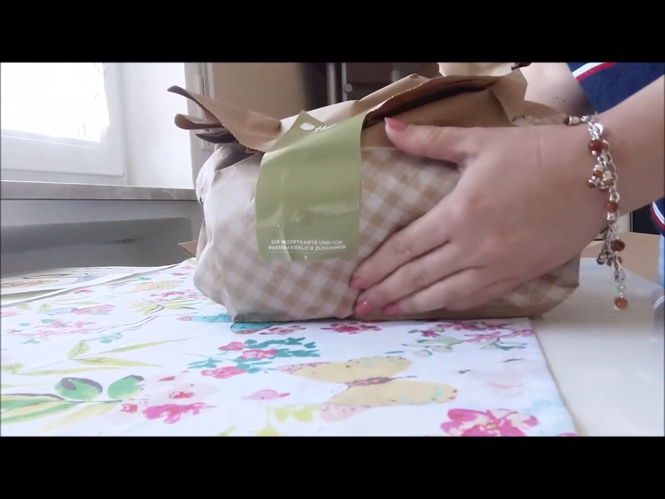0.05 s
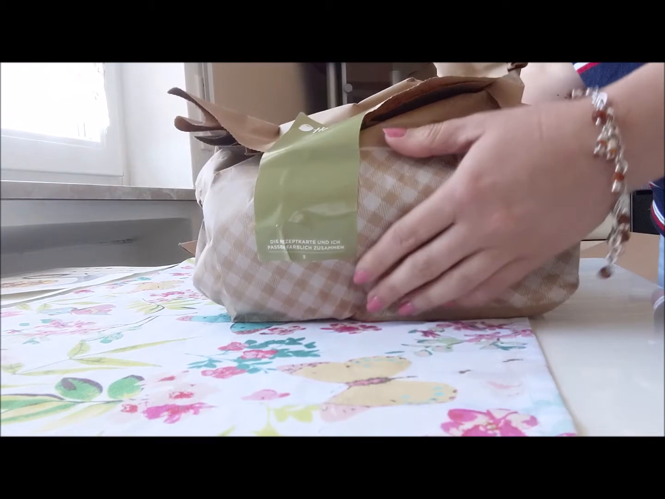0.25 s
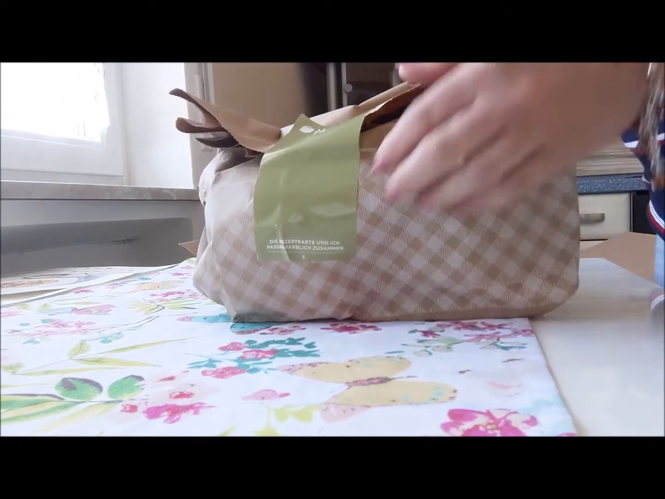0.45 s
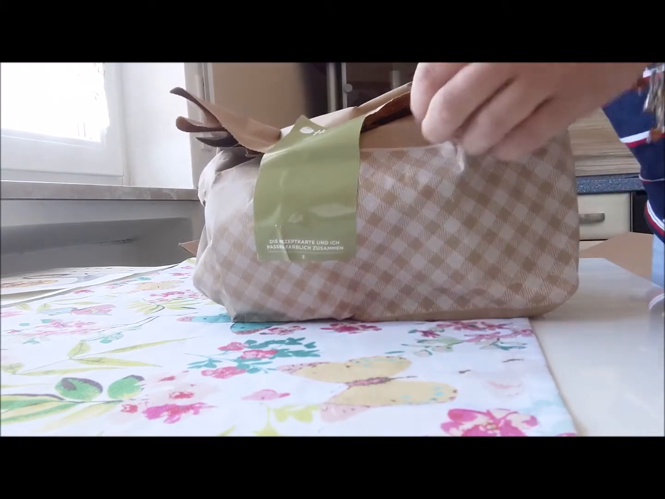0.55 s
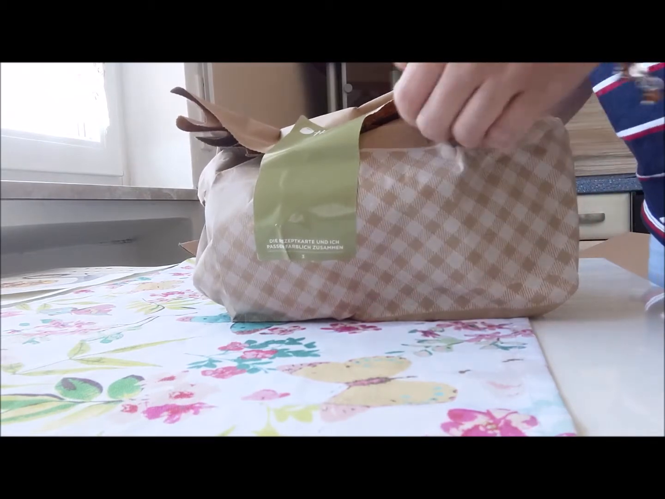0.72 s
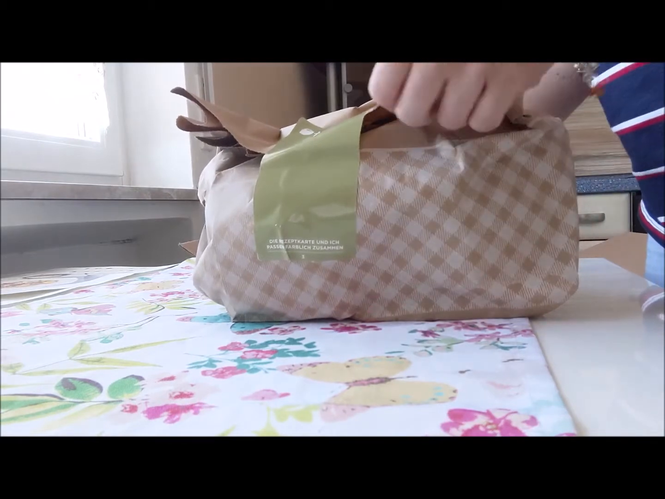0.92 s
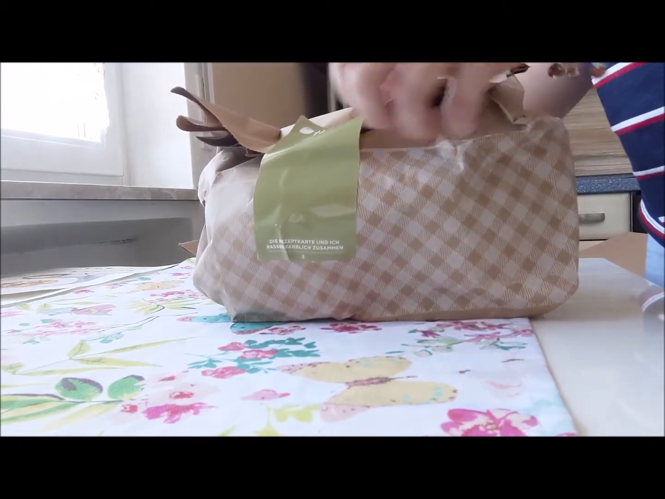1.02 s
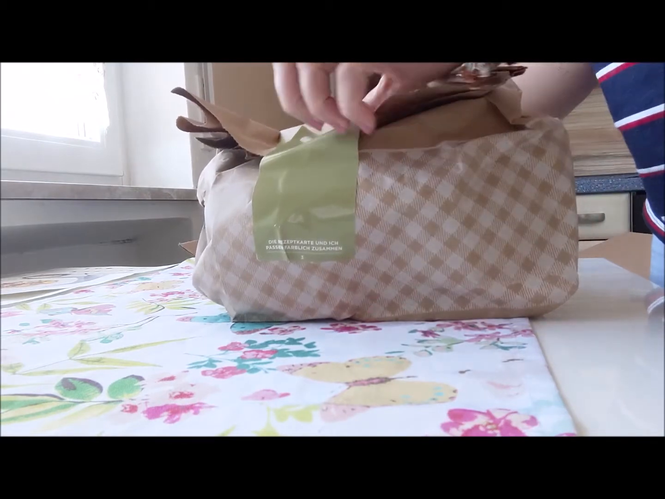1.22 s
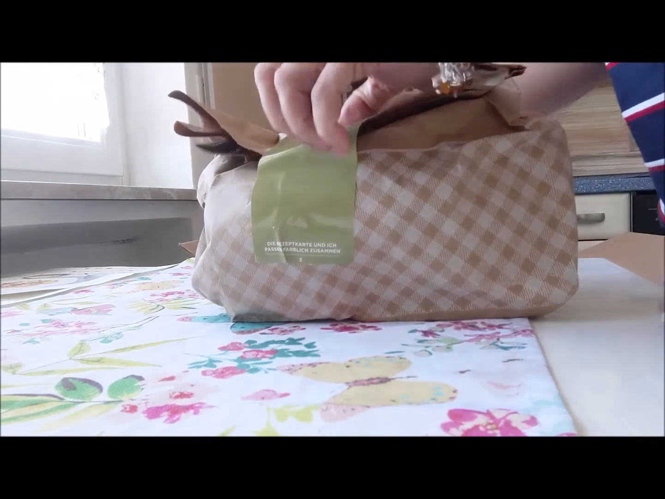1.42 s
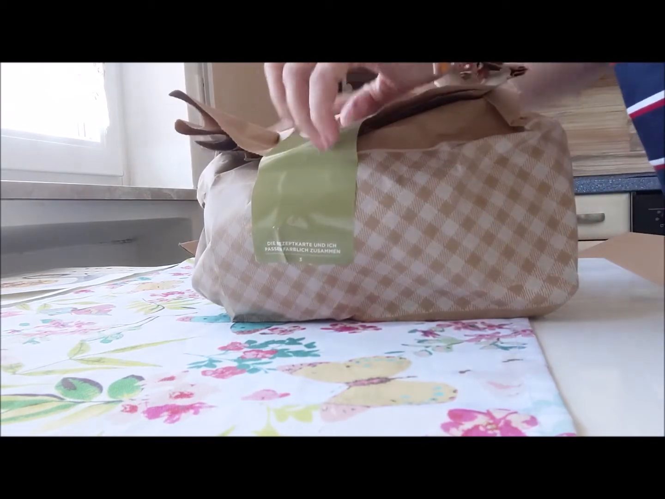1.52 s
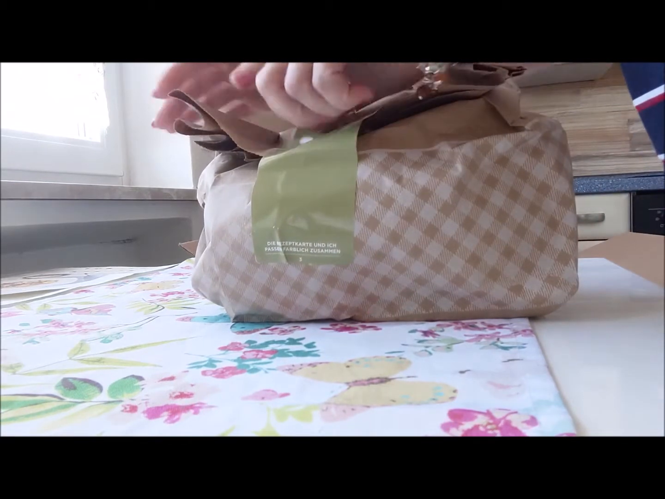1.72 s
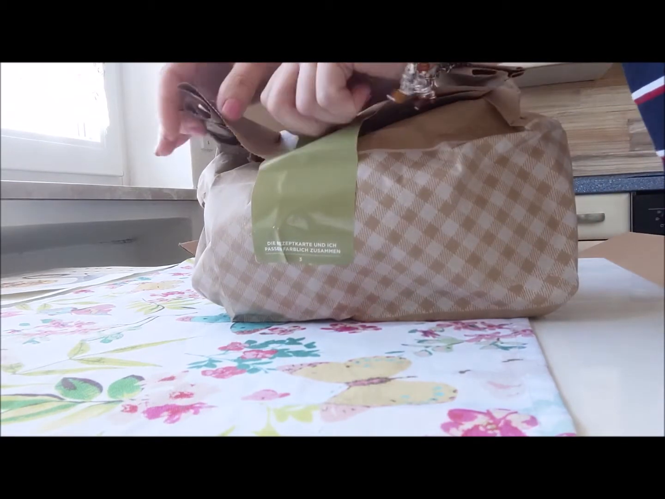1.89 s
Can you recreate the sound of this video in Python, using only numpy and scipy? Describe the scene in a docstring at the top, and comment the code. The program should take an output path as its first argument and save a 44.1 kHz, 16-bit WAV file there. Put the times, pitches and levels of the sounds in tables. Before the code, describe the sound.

Stiff paper bag crackles and rustles as its top is folded over on a table, close by

```python
"""A filled paper bag is set upright on a table and its top is folded over, close by in a small room.
Creases snap as cracks and ticks that ring the paper panels; small creases crinkle as random clicks.
Fingers and paper slide with a rasp and a fine hiss; soft pushes ring the table, one of them a clear thump.
The folding top creaks as a run of short rings that sink in pitch; room rumble and hiss lie underneath."""
import sys
import numpy as np
from scipy import signal
from scipy.fft import rfft, irfft
from scipy.io import wavfile
from scipy.ndimage import map_coordinates

SR = 44100
rng = np.random.default_rng(int(sys.argv[2]) if len(sys.argv) > 2 else 0)


def generate_wav(sig):
    """Save sig (samples, or channels by samples) to the path in sys.argv[1] as 16-bit PCM at SR."""
    pcm = np.round(np.clip(np.atleast_2d(sig).T, -1, 1) * 32767).astype(np.int16)
    wavfile.write(sys.argv[1], SR, pcm)


N = 85995

# Spectrum of a crease crack. Each row: frequency in Hz, level in dB.
CRACK_COLOUR = [(60, -15), (250, -5), (700, -5.5), (2000, 3), (3300, 0), (5200, -5), (7000, -11),
                (16000, -24.5)]
CREASE_SPREAD_DB = 2.5


def undb(db):
    """Decibels to gain."""
    return 10 ** (np.asarray(db) / 20)


def unit(x):
    """Scale to rms 1."""
    return x / np.sqrt(np.mean(x ** 2))


def at(points, hz):
    """Read a (Hz, value) table on a log-frequency axis."""
    table_hz, values = np.array(points).T
    return np.interp(np.log(hz + 1), np.log(table_hz), values)


def curve(rows, axis=1):
    """Gain over time from a dB column."""
    rows = np.array(rows)
    return undb(np.interp(np.arange(N) / SR, rows[:, 0], rows[:, axis]))


def convolve(x, response):
    """Pass a sound through a response."""
    return signal.fftconvolve(x, response)[:len(x)]


def colour(x, points, size=2048):
    """Minimum-phase filter with the given spectrum shape; its impulse response peaks at 1."""
    log_gain = np.log(undb(at(points, np.fft.rfftfreq(size, 1 / SR))))
    # Folding the cepstrum onto positive time makes the filter causal.
    cepstrum = irfft(log_gain)
    cepstrum[1:size // 2] *= 2
    cepstrum[size // 2 + 1:] = 0
    response = irfft(np.exp(rfft(cepstrum)))
    return convolve(x, response / np.abs(response).max())


def add(out, start_s, x):
    """Mix a sound in at start_s."""
    i = int(start_s * SR)
    out[i:i + len(x)] += x[:N - i]


def grains(per_s, spread_db):
    """Random tiny clicks of either sign, a few much larger than the rest."""
    size = undb(spread_db * np.minimum(rng.exponential(size=N), 4))
    present = rng.random(N) < per_s / SR
    return present * size * rng.choice([-1, 1], N)


def bag(x):
    """The hollow bag adds a few narrow resonances."""
    # Bag resonances. Each row: frequency in Hz, bandwidth in Hz, level in dB.
    bag_modes = [(493, 5.7, -38.5), (763.4, 20.7, -0.5), (825.6, 23.7, -6), (1340, 24.6, -14.5)]
    return x + sum(undb(db) * signal.lfilter(*signal.iirpeak(hz, hz / width_hz, SR), x)
                   for hz, width_hz, db in bag_modes)


def floor():
    """Quiet room rumble and hiss: coloured noise, mostly common to both channels."""
    # Floor spectrum. Each row: frequency in Hz, level in dB.
    floor_colour = [(20, -8.5), (45, 8.5), (110, -3.5), (250, -14), (650, -14), (1200, -21.5), (4000, -25),
                    (16000, -50.5)]
    level_db, side_db = -56, -10
    mid, side = (unit(colour(rng.standard_normal(N), floor_colour)) for _ in range(2))
    return undb(level_db) * (mid + undb(side_db) * side * np.array([[1], [-1]]))


def fits():
    """Paper gives in fits and starts: gain jumps at random moments and holds until the next catch."""
    catches_per_s, range_db = 170, 3.5 * 2.08
    catch = np.cumsum(rng.random(N) < catches_per_s / SR)
    return unit(undb(rng.uniform(-range_db, range_db, N))[catch])


def rustle():
    """Small creases crinkle in spurts as the bag bends; fibres catch and slip where surfaces slide."""
    # Spectra of crinkle, rasp and fine hiss. Each row: frequency in Hz, level in dB.
    crinkle_colour = [(50, -2), (150, -15), (300, -6.5), (520, -4.5), (820, -2), (1400, -4.5), (2200, -8),
                      (3200, -17), (7000, -24.5), (16000, -34.5)]
    rasp_colour = [(100, -26.5), (1000, -6), (2200, -5), (3800, 1), (5300, -0.5), (7000, -8), (10000, -8),
                   (16000, -39.5)]
    hiss_colour = [(100, -45), (4000, -11.5), (7000, -8.5), (10000, 0.5), (12500, 3), (16000, -6)]
    # How hard the paper is bent. Each row: time in seconds, crinkle level in dB.
    bend = [(0, -54), (.21, -50.5), (.24, -44), (.29, -61), (.41, -50), (.55, -43.5), (.58, -56),
            (.63, -46.5), (.69, -48), (.72, -73.5), (.80, -61.5), (.835, -45), (.87, -40.5), (.92, -57),
            (.935, -52.5), (1.0, -50.5), (1.03, -62.5), (1.10, -58.5), (1.12, -100.5), (1.318, -60.5),
            (1.328, -42.5), (1.365, -51), (1.39, -34.5), (1.465, -43.5), (1.50, -60.5), (1.56, -48.5),
            (1.585, -40.5), (1.615, -52), (1.66, -50.5), (1.675, -46), (1.71, -57), (1.87, -52),
            (1.95, -58)]
    # Sliding contact. Each row: time in seconds, rasp level in dB, hiss level in dB, both before trim.
    rub = [(0, -62, -70.5), (.28, -57, -63), (.38, -51, -56), (.45, -69, -71), (.55, -47, -61.5),
           (.565, -40, -45), (.69, -56.5, -66.5), (.725, -74, -72.5), (.80, -68, -88.5), (.86, -51, -62),
           (.953, -53.5, -71), (.96, -50.5, -60.5), (1.005, -51, -58.5), (1.03, -69, -69),
           (1.085, -52.5, -60), (1.125, -94, -75.5), (1.178, -85.5, -79), (1.19, -61.5, -67),
           (1.27, -56.5, -56.5), (1.405, -51, -58), (1.414, -38.5, -42), (1.45, -42.5, -57),
           (1.52, -58.5, -65), (1.585, -58, -67.5), (1.635, -53, -64.5), (1.652, -44, -46.5),
           (1.72, -59.5, -66.5), (1.95, -55.5, -62)]
    creases_per_s, fibres_per_s, fibre_spread_db = 1400, 4500, 2.5
    rasp_trim_db, hiss_trim_db = -0.5, 3.5

    spurts = fits()
    creases = spurts * grains(creases_per_s, CREASE_SPREAD_DB)
    crinkle = unit(bag(colour(creases, crinkle_colour)))
    slips = np.sqrt(spurts) * grains(fibres_per_s, fibre_spread_db)
    rasp = unit(colour(slips, rasp_colour))
    hiss = unit(colour(grains(fibres_per_s, fibre_spread_db), hiss_colour))
    sliding = undb(rasp_trim_db) * rasp * curve(rub) + undb(hiss_trim_db) * hiss * curve(rub, axis=2)
    return crinkle * curve(bend) + sliding


def spray(t, scatter, decay_s):
    """A sharp pulse trailed by a spray of breaking fibres, its spectrum flattened."""
    x = (t == 0) + scatter * rng.standard_normal(len(t)) * np.exp(-t / decay_s)
    flat = irfft(np.exp(1j * np.angle(rfft(x))), len(t))
    return np.linalg.norm(x) * flat * (t < t[-1] / 2)  # drop the wrapped half


def snaps():
    """A crease buckles: a crack, a treble tick, and a few cycles of the paper panel."""
    # Buckling creases. Each row: start in seconds, panel pitch in Hz, then ring, crack and tick level in dB.
    creases = [(0.1118, 1286, -29.5, -63.5, -57.5), (0.228, 642, -34.5, -39, -61.5),
               (0.3113, 445.3, -33.5, -41.5, -58), (0.392, 1414, -19.5, -25.5, -25.5),
               (0.3932, 344.3, -28, -55.5, -54), (0.5553, 1947, -16, -15, -8.5),
               (0.5565, 818.5, -15, -31.5, -12), (0.6220, 780, -33.5, -53.5, -51),
               (0.7478, 303, -38, -32, -29.5), (0.8104, 653.5, -32, -41, -46.5),
               (0.8475, 698, -29, -38.5, -43), (0.8643, 896, -28, -55, -43.5),
               (0.8730, 848, -26.5, -58, -36.5), (0.929, 487.4, -36, -50, -44), (1.098, 681, -41, -56, -59),
               (1.3739, 1437, -16.5, -22, -27), (1.3751, 712, -20.5, -21.5, -40),
               (1.3900, 1806, -15, -29, -44), (1.4096, 1300, -15.5, -43, -39),
               (1.4243, 867.6, -14.5, -20.5, -30), (1.5792, 1104, -36, -47.5, -51),
               (1.5850, 1336, -26.5, -32, -54.5), (1.6453, 1390, -44.5, -38, -31),
               (1.6676, 1340, -24, -30.5, -37.5), (1.674, 1420, -24.5, -39.5, -47.5),
               (1.8105, 788, -43, -55.5, -33), (1.93, 1157, -34, -56, -58.5)]
    # Panel modes. Each row: frequency ratio to panel pitch, level in dB.
    panel_modes = [(1, 2), (1.5, -3), (2.4, -6), (3.8, -12)]
    # Treble tick spectrum. Each row: frequency in Hz, level in dB.
    tick_colour = [(100, -35), (3000, -15.5), (5400, 1.5), (7200, -3), (9000, 4.5), (12000, 3),
                   (16000, -11.5)]
    crack_decay_s, crack_scatter = 0.001301, 0.6857
    tick_decay_s, tick_scatter = 0.00097, 0.238
    ring_decay_cycles, ring_rise_s = 1.423, 0.000571

    out, t = np.zeros(N), np.arange(SR // 12) / SR
    for start_s, hz, ring_db, crack_db, tick_db in creases:
        crack = colour(spray(t, crack_scatter, crack_decay_s), CRACK_COLOUR)
        tick = colour(spray(t, tick_scatter, tick_decay_s), tick_colour)
        panel = sum(undb(db) * np.sin(2 * np.pi * (hz * ratio * t + rng.random()))
                    for ratio, db in panel_modes)
        panel *= np.exp(-t * hz / ring_decay_cycles) * (1 - np.exp(-t / ring_rise_s))
        snap = undb(crack_db) * crack + undb(tick_db) * tick + undb(ring_db) * panel
        add(out, start_s, -snap)
    return bag(out)


def bumps():
    """Soft pushes of the bag ring the table; a longer contact is duller."""
    # Pushes. Each row: start in seconds, level in dB, contact in seconds.
    pushes = [(0.192, -36, 0.00473), (0.2259, -17, 0.00289), (0.556, -42.5, 0.00234), (0.745, -33, 0.0096),
              (0.944, -35.5, 0.00587), (1.374, -38.5, 0.0018), (1.421, -39.5, 0.00152),
              (1.677, -37, 0.01014)]
    # Modes of table and contents. Each row: frequency in Hz, level in dB, 60 dB decay in seconds.
    table_modes = [(88.8, -4, 0.172), (110.64, 1, 0.0765), (129.06, -7.5, 0.1578), (226.7, -11.5, 0.0874),
                   (368.7, -5.5, 0.068)]
    rise_s = 0.00547

    out, t = np.zeros(N), np.arange(SR // 3) / SR
    ring = sum(undb(db) * np.sin(2 * np.pi * hz * t) * np.exp(-np.log(1000) * t / t60_s)
               for hz, db, t60_s in table_modes)
    ring = ring * (1 - np.exp(-t / rise_s))
    for start_s, db, contact_s in pushes:
        push = np.sin(np.pi * np.minimum(t / contact_s, 1)) ** 2
        add(out, start_s, undb(db) * convolve(ring, push / push.sum()))
    return out


def fold():
    """Rolling the top over: small creases tick and ring the flap, which sinks in pitch as it lengthens."""
    # Creak. Each row: time in seconds, mean pitch in Hz, level in dB.
    creak = [(0.828, 646, -55.5), (0.86, 530, -39.5), (.92, 474, -50), (1.0, 475, -57.5)]
    creases_per_s, decay_cycles, pitch_scatter, tick_db = 300, 3.03, 0.125, 1.5

    out, t = np.zeros(N), np.arange(SR // 25) / SR
    times_s, pitches_hz, levels_db = np.array(creak).T
    tick = undb(tick_db) * np.diff(colour(1. * (t == 0), CRACK_COLOUR), prepend=0)
    for start_s in np.flatnonzero(rng.random(N) < creases_per_s / SR) / SR:
        if times_s[0] < start_s < times_s[-1]:
            pitch_draw, level_draw = rng.standard_normal(2)
            hz = np.interp(start_s, times_s, pitches_hz) * np.exp(pitch_scatter * pitch_draw)
            size = undb(np.interp(start_s, times_s, levels_db) + CREASE_SPREAD_DB * level_draw)
            ring = np.sin(2 * np.pi * hz * t) * np.exp(-t * hz / decay_cycles)
            add(out, start_s, size * (tick + ring))
    return out


def room(x, wet_db):
    """Direct sound reaches the left port first; the diffuse tail is alike on both ports only in the bass."""
    # Reverberation. Each row: frequency in Hz, 60 dB decay in seconds.
    room_t60 = [(100, 0.226), (500, 0.1885), (4000, 0.269), (11000, 0.1097)]
    tail_delay_s, port_path_m, sound_m_per_s = .003, .056, 343
    # Creases lie all over the bag, so the lag between the ports wanders.
    lag_scatter_s, lag_changes_per_s = .00005, 150

    t, samples = np.arange(SR // 2) / SR, np.arange(N)
    hz = np.fft.rfftfreq(len(t), 1 / SR)
    likeness = np.sinc(hz * .0009)
    mid, side = rfft(rng.standard_normal((2, len(t))))
    noise = mid * np.sqrt(1 + likeness) + np.array([side, -side]) * np.sqrt(1 - likeness)

    # Overlapping bands, each with its own decay.
    centres_hz = np.geomspace(100, 16000, 8)
    tails = 0
    for centre_hz, weights in zip(centres_hz, np.eye(len(centres_hz))):
        band = irfft(noise * at(list(zip(centres_hz, weights)), hz))
        tails = tails + band * np.exp(-np.log(1000) * t / at(room_t60, centre_hz))
    tails = tails * (t > tail_delay_s)
    wet = np.array([convolve(x, tail / np.linalg.norm(tail)) for tail in tails])

    place = np.interp(samples / SR * lag_changes_per_s, samples, rng.standard_normal(N))
    lag_s = port_path_m / sound_m_per_s + lag_scatter_s * place
    right = map_coordinates(x, [samples - lag_s * SR], order=5)
    return np.array([x, right]) + undb(wet_db) * wet


def scene():
    """The bag on its table in the room."""
    handling = room(rustle() + fold(), wet_db=-4)
    return floor() + handling + room(snaps(), wet_db=-9) + room(bumps(), wet_db=-5.5)


def record(dry):
    """The right port is brighter than the left; the lowest bass is thinned and the top is cut steeply."""
    bass_pan_db, mid_pan_db, treble_pan_db = -1, 1.07, -4  # left minus right
    low_cut_hz, top_hz = 69.1, 16100
    pan = [(130, bass_pan_db), (300, 0), (1500, mid_pan_db), (5000, mid_pan_db), (11000, treble_pan_db)]
    pan_db = at(pan, np.fft.rfftfreq(N, 1 / SR))
    heard = irfft(rfft(dry) * undb(np.array([pan_db, -pan_db]) / 2), N)
    heard = signal.sosfilt(signal.butter(2, low_cut_hz, "high", fs=SR, output="sos"), heard)
    return signal.sosfilt(signal.ellip(8, .2, 80, top_hz, fs=SR, output="sos"), heard)


dry = scene()
out = record(dry)
generate_wav(out)
```